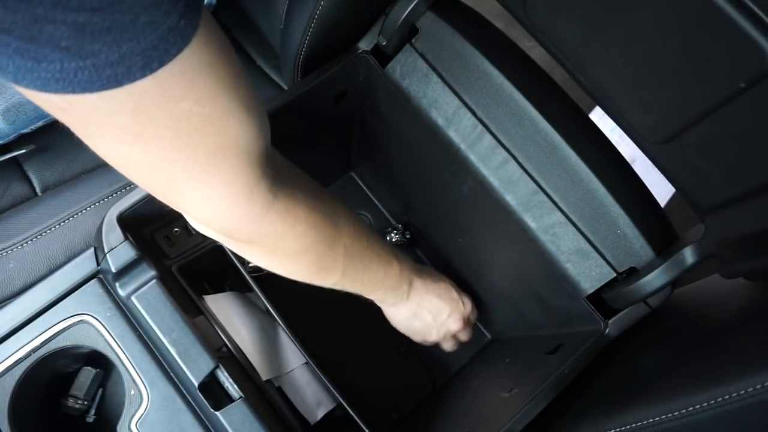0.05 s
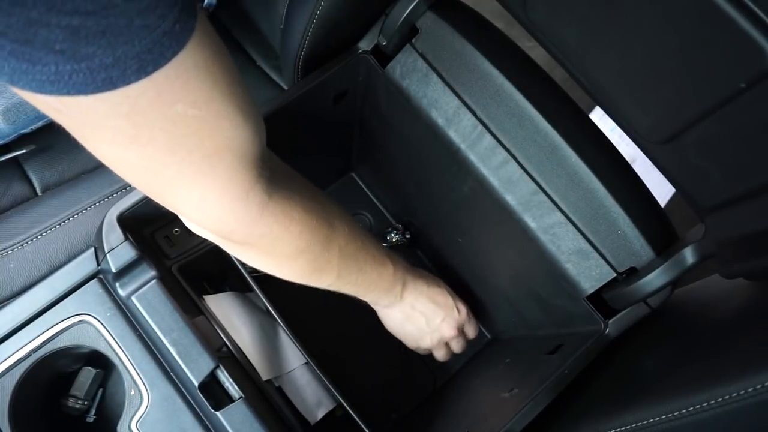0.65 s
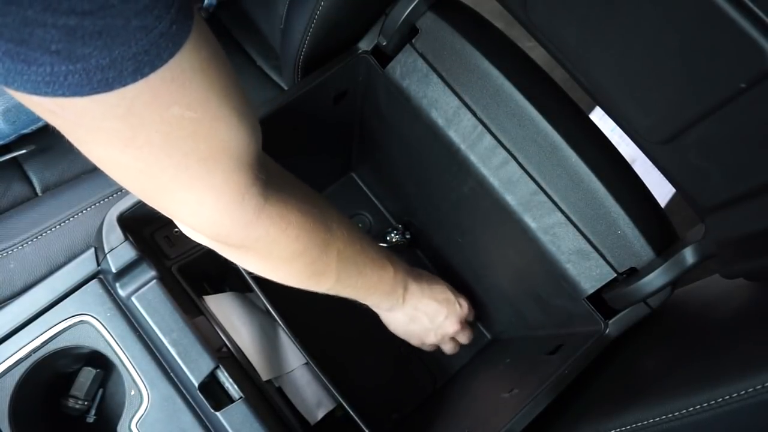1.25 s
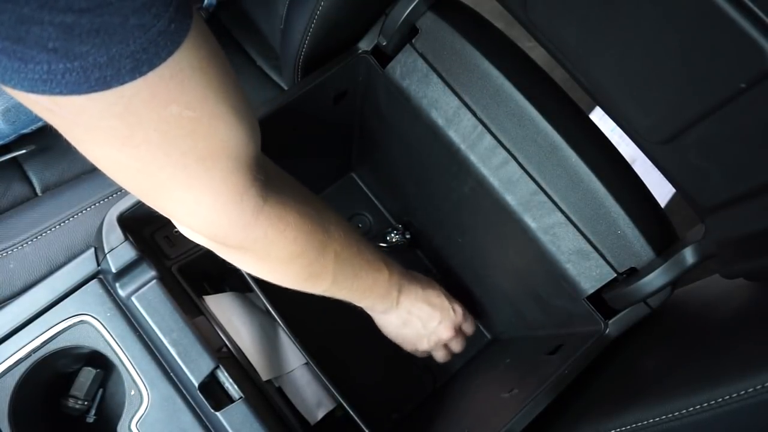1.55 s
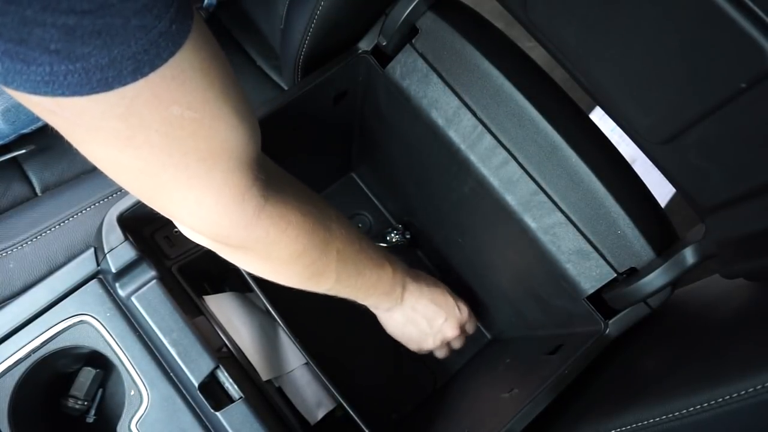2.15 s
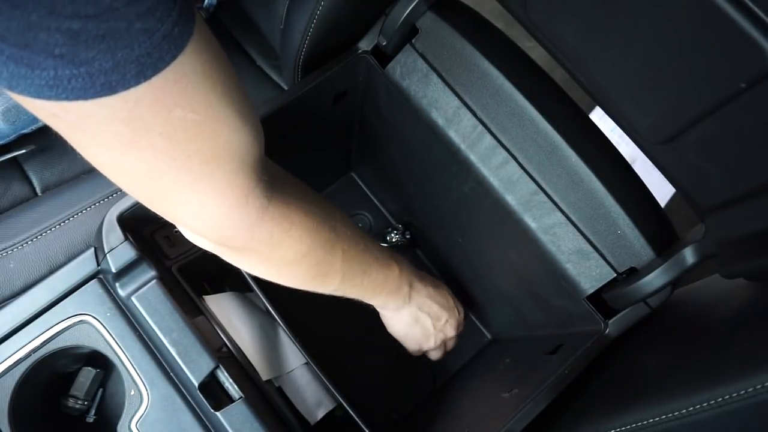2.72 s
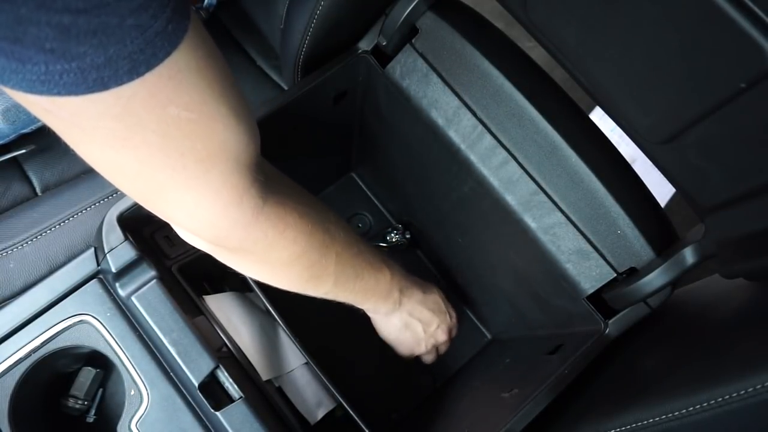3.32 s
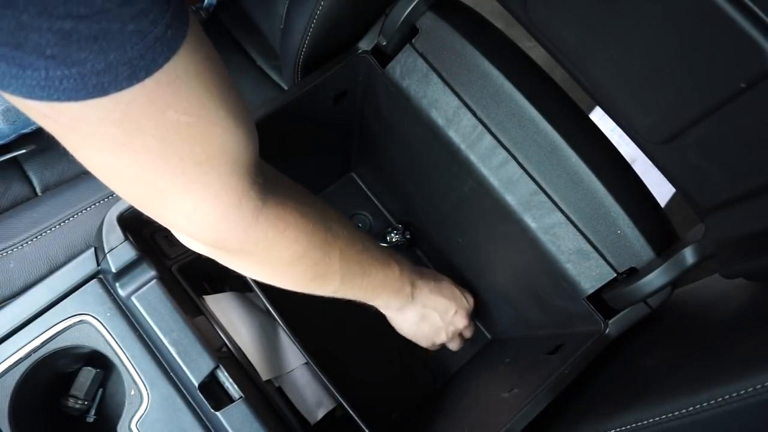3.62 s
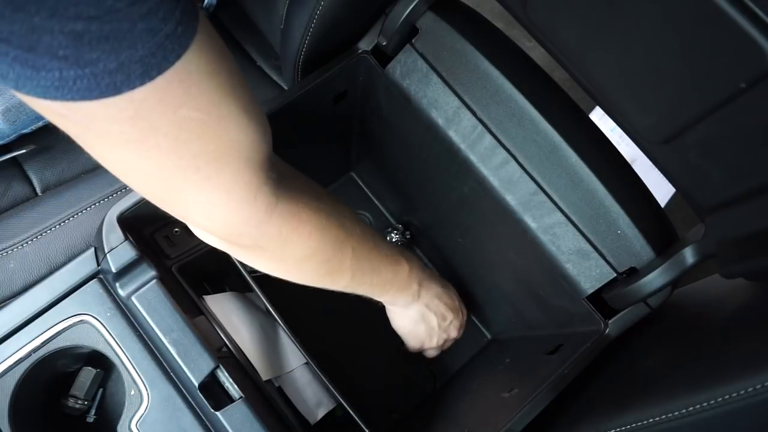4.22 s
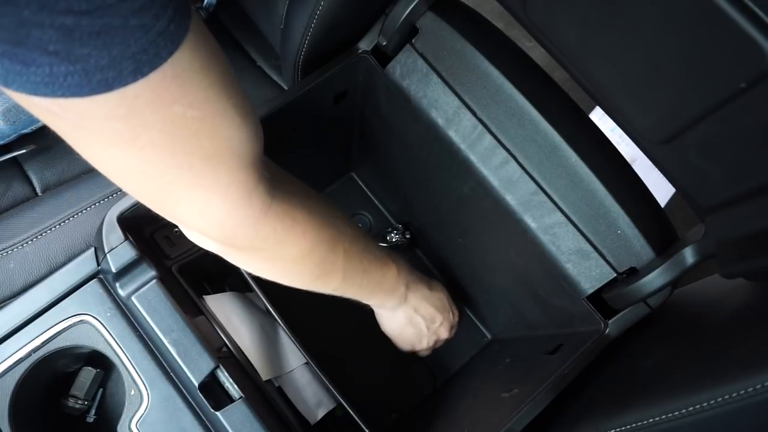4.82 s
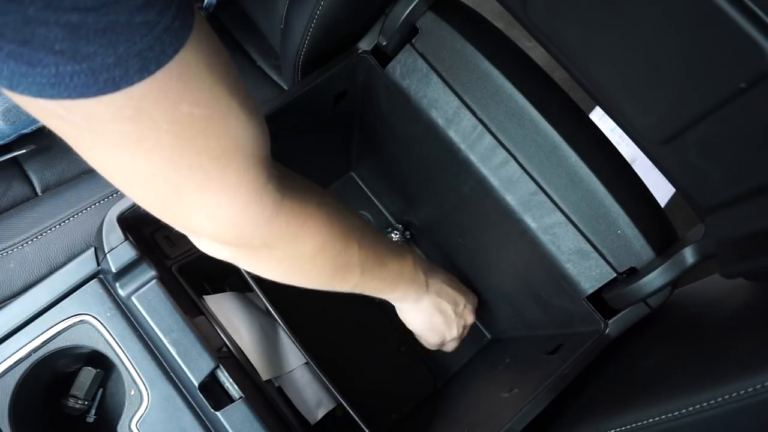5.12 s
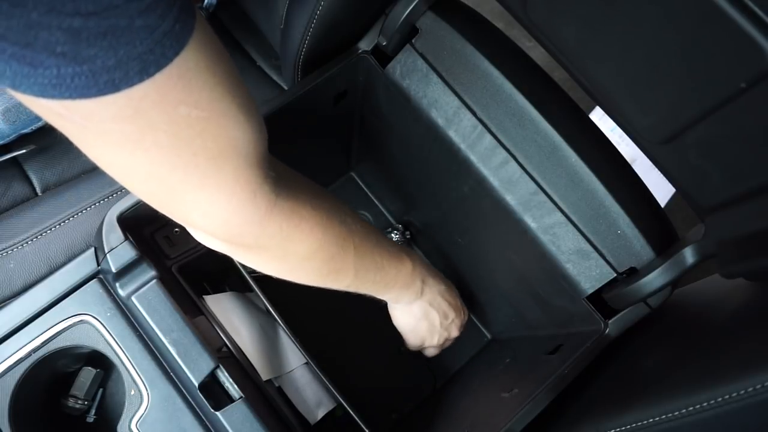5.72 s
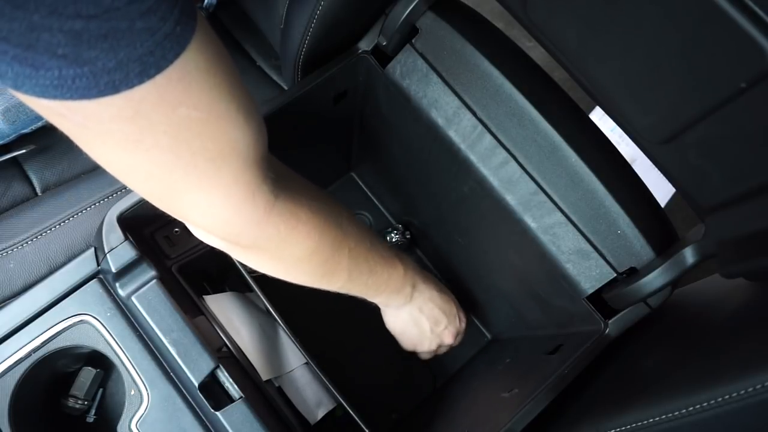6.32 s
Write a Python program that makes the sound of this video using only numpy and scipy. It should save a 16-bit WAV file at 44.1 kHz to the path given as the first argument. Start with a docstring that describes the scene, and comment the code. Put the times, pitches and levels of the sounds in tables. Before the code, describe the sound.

A hand works bolts and small hardware inside an open plastic storage bin in a parked car, heard close and slightly to the right. A faint cabin rumble and thin hiss run throughout. From the start come quick, uneven clicks and knocks, each with a tiny rattle and a short, hollow plastic ring; a few are brighter metal ticks. Brief, soft scrapes on the plastic fall between them. The handling stays busy for three seconds, with a stronger knock at about 2.5 seconds. From 3 to 4.3 seconds it thins to light rubbing and a few faint ticks. A firm click at 4.4 seconds starts another cluster, and the loudest knock lands at 5.2 seconds, after which the volume dips briefly. More distinct knocks follow at about 5.6, 5.9 and 6.4 seconds, with a little scraping up to the end at 6.6 seconds.

```python
"""A hand works bolts and small hardware at the bottom of an open plastic storage bin in a parked car.
A faint cabin rumble and hiss are there from the start. At once the knocks begin: each chatters for a
few ms and rings the bin's walls and air space. Between knocks, the parts rub on the plastic.
After 3 s the knocks thin out; they pick up again at 4.4 s, and the loudest lands at 5.2 s.
A close stereo microphone hears it all, and its gain ducks after the loudest knocks."""
import sys
import numpy as np
from scipy import signal
from scipy.fft import rfft, irfft, next_fast_len
from scipy.io import wavfile
from scipy.ndimage import uniform_filter1d, minimum_filter1d

SR = 44100
rng = np.random.default_rng(int(sys.argv[2]) if len(sys.argv) > 2 else 0)


def unload_wav(signal):
    """Save mono or channel-first audio to the path in sys.argv[1] as 16-bit WAV at rate SR, clipped to [-1, 1]."""
    wavfile.write(
        sys.argv[1],
        SR,
        np.round(np.clip(np.atleast_2d(signal).T, -1, 1) * 32767).astype(np.int16),
    )


N = 289207
RING = 12288  # samples set aside for one touch to ring out
LEAD_S = .012  # a part slides this long before it lands


def undb(db):
    """Turn decibels into a factor to multiply by."""
    return 10 ** (np.asarray(db) / 20)


def unit(x):
    """Scale a sound so that its average level (rms) is 1."""
    return x / np.sqrt(np.mean(x ** 2))


def tint(x, points):
    """A tone control that follows (f/Hz, level/dB) points and never rings ahead of the sound."""
    n = next_fast_len(x.shape[-1] // 2 + 1024) * 2
    hz, db = np.transpose(points)
    gain = undb(np.interp(np.log(np.arange(n // 2 + 1) * SR / n + 1), np.log(hz), db))
    cepstrum = irfft(np.log(gain))
    cepstrum[1:n // 2] *= 2  # move all ringing to after its cause
    cepstrum[n // 2 + 1:] = 0
    return irfft(rfft(x, n) * np.exp(rfft(cepstrum)))[..., :x.shape[-1]]


def stereo_noise(size, apart_hz):
    """White noise, alike left and right in the bass and unrelated well above apart_hz."""
    mid, side = rfft(rng.standard_normal((2, size)))
    hz = np.arange(len(mid)) * SR / size
    share = hz ** 2 / (hz ** 2 + apart_hz ** 2) / 2
    return irfft(mid * np.sqrt(1 - share) + side * np.sqrt(share) * np.array([[1], [-1]]), size)


def steady_noise(tone, apart_hz):
    """Stereo noise with the given tone, as long as the scene, at level 1."""
    noise = stereo_noise(2 * next_fast_len(N // 2 + 1), apart_hz)
    return unit(tint(noise[:, :N], tone))


def wander(turns_per_s):
    """A smooth random curve that strays about 1 either side of zero."""
    step = int(SR / turns_per_s)
    stairs = np.repeat(rng.standard_normal(N // step + 1), step)
    return unit(uniform_filter1d(stairs, step)[:N])


# The tone of the rumble: f/Hz, relative level/dB
RUMBLE_TONE = [(20, -25), (41, -3.5), (55, -16), (80, -17), (125, -6.5), (170, -14.5), (235, -9.5),
               (350, -18), (900, -16), (1500, -24.5), (3000, -38.5)]
# The notes at which the cabin's air drones: f/Hz, level before the swells/dB
DRONE_NOTES = [(39, -77.5), (134.6, -59), (231.5, -65)]
def cabin_rumble():
    """A low rumble, plus a few wavering notes at which the air in the car resonates."""
    t = np.arange(N) / SR
    rumble = steady_noise(RUMBLE_TONE, apart_hz=1100) * undb(-46.5 + wander(2.52))
    for hz, db in DRONE_NOTES:
        angle = 2 * np.pi * hz * t
        rumble += undb(db) * (wander(11) * np.sin(angle) + wander(5.2) * np.cos(angle))
    return rumble


# The tone of the hiss: f/Hz, relative level/dB
HISS_TONE = [(300, 6.5), (1200, -26), (2000, 6.5), (3100, 7.5), (3800, 1.5), (6000, -1), (10000, -4),
             (15500, -21.5)]
# How the hiss swells and fades: t/s, level/dB
HISS_SWELLS = [(0, -58), (.95, -61), (1.1, -57), (1.7, -57.5), (1.95, -59), (3.2, -60), (4.2, -61.5),
               (4.6, -58), (5.2, -56.5), (5.4, -57), (6.56, -63)]
def cabin_background():
    """A thin hiss and the rumble swell and fade together."""
    hiss_db = np.interp(np.arange(N) / SR, *np.transpose(HISS_SWELLS))
    rumble = cabin_rumble() * undb(hiss_db - hiss_db.mean())
    hiss = steady_noise(HISS_TONE, apart_hz=2330) * undb(hiss_db)
    return rumble + hiss


def contact(chatter_s, tap=0.77, bounce=0.78, bounces=12, soft_s=0.0042, slide_db=-18, slide_s=0.0022):
    """A brief slide, a tap and a few uneven bounces; a part that chatters for long lands softly."""
    force = np.zeros(RING)
    lead = int(LEAD_S * SR)
    force[lead] = tap / (1 + (chatter_s / soft_s) ** 2)
    when = (np.arange(bounces) + rng.random(bounces)) / bounces  # 0 to 1 through the bouncing
    kicks = bounce * rng.standard_normal(bounces) * (1 - when)
    np.add.at(force, lead + (2 * chatter_s * SR * when).astype(int), kicks)
    strength = np.linalg.norm(force)
    slide = rng.standard_normal(lead) * np.exp((np.arange(lead) - lead) / (slide_s * SR))
    force[:lead] = slide * undb(slide_db) * strength / np.linalg.norm(slide)
    # notes below 550 Hz feel the whole landing as one push
    push = strength * signal.unit_impulse(RING, lead + int(chatter_s * SR / 2))
    low, high = (signal.butter(2, 550, kind, fs=SR, output="sos") for kind in ("low", "high"))
    return signal.sosfilt(low, push) + signal.sosfilt(high, force)


# The tone of the many wall vibrations and echoes in the bin: f/Hz, relative level/dB
WALL_TONE = [(100, -45), (400, -16), (800, -15.5), (1300, -10), (1900, -22), (2800, -18), (3700, -26),
             (5500, -24), (8000, -26.5), (11000, -30), (15500, -43.5)]
def wall_echoes(burst_s=0.0089, tail_s=0.085, tail_db=-11, rise_s=0.00049):
    """Crowded echoes: a quick burst from the bin, then a short tail from the muffled cabin."""
    t = np.arange(RING) / SR
    fade = undb(-60 * t / burst_s) + undb(tail_db - 60 * t / tail_s)
    shape = fade * (1 - np.exp(-t / rise_s))
    return tint(stereo_noise(RING, apart_hz=2040) * shape / np.linalg.norm(shape), WALL_TONE)


# The notes the bin rings with: f/Hz, relative level/dB, time to fade 60 dB before ring_scale/s
BIN_NOTES = [(145.5, -7.5, 0.26), (197.4, -11, 0.14), (241.5, -8.5, 0.058), (277.6, 4.5, 0.19),
             (309, 1, 0.2), (501, -3, 0.07), (550, -7, 0.11), (616, -15, 0.048), (726.3, 2, 0.071),
             (805, 0.5, 0.042), (887.7, 1.5, 0.059), (999.4, -3.5, 0.096), (1143, -20, 0.1),
             (1292, -11, 0.067), (1361, -15.5, 0.021), (1510.6, -7.5, 0.13), (1846, -17, 0.14),
             (2191, -8.5, 0.077), (2620, -19.5, 0.13), (2660, -19, 0.051), (3044, -19.5, 0.042),
             (4187, -20.5, 0.053), (4950, -26, 0.046), (5540, -31, 0.036), (5865, -24.5, 0.033)]
def bin_ring(phases, scatter_db=2.5, build_cycles=0.46, ring_scale=0.89):
    """The bin's answer to one tap; where the tap lands changes how strong each note is."""
    t = np.arange(RING) / SR
    hz, db, fade_s = np.transpose(BIN_NOTES)
    decays = np.log(1000) / (fade_s * ring_scale)
    sizes = 2 * decays / SR * undb(db + scatter_db * rng.standard_normal(len(hz)))
    ring = np.zeros((2, RING))
    for note_hz, decay, size, phase in zip(hz, decays, sizes, phases):
        age = t[:int(np.log(1000) / decay * SR)]
        build = 1 - np.exp(-age * note_hz / build_cycles)  # a note takes a moment to fill the bin
        wave = np.sin(2 * np.pi * note_hz * age + phase[:, None])
        ring[:, :len(age)] += size * build * np.exp(-decay * age) * wave
    return ring


def part_ring(low_hz=1000, high_hz=9000, fade_s=0.039, peak_db=-10, fall_db_per_octave=2.5, notes=6):
    """The touched part, muted by the fingers, adds a few short notes that change with every grip."""
    t = np.arange(RING // 4) / SR
    octaves = np.log2(high_hz / low_hz) * rng.random((notes, 1, 1))
    phases = rng.uniform(0, 2 * np.pi, (notes, 1, 1))
    apart = np.minimum(octaves, 2) * rng.normal(0, 0.39, (notes, 2, 1))  # left and right out of step
    decay = np.log(1000) / fade_s
    sizes = 2 * decay / SR * undb(peak_db - fall_db_per_octave * octaves)
    waves = np.sin(2 * np.pi * low_hz * 2 ** octaves * t + phases + apart)
    ring = np.sum(sizes * waves, axis=0) * np.exp(-decay * t)
    return np.pad(ring, ((0, 0), (0, RING - len(t))))


def struck_bin(walls, phases, own_share=0.78):
    """Bin and part ring together; each spot in the bin has partly its own echoes."""
    echoes = np.sqrt(1 - own_share) * walls + np.sqrt(own_share) * wall_echoes()
    return echoes + bin_ring(phases) + part_ring()


# The pitch ranges of a touch's thump, knock, clack, tick and sizzle: lowest f/Hz, highest f/Hz
TOUCH_BANDS = [(110, 400), (400, 1200), (1200, 4000), (4000, 8500), (8500, 16000)]
def touch_levels(level_db, slope_db, thump_db, treble_db):
    """A level for each range: a softer touch has less treble, and weight behind it adds thump."""
    centres = np.sqrt(np.prod(TOUCH_BANDS, axis=1))
    octaves = np.maximum(np.log2(centres / centres[1]), 0)
    return level_db + slope_db * octaves + np.array([thump_db, 0, *treble_db])


def colour(x, levels_db, seconds, part_hz=1000, part_db=0, part_octaves=0.17, bass_hz=135):
    """Bring each range to its level, as if the sound lasted `seconds`; the part can lift one note."""
    hz = np.arange(x.shape[1] // 2 + 1) * SR / x.shape[1] + 1
    power = np.mean(np.abs(rfft(x)) ** 2, axis=0) * 2 / (x.shape[1] * seconds * SR)
    log_centres = np.log(np.prod(TOUCH_BANDS, axis=1)) / 2
    db = part_db / (1 + (np.log2(hz / part_hz) / part_octaves) ** 2)
    db -= 10 * np.log10(1 + (bass_hz / (hz + 10)) ** 4)  # small panels give off little bass
    for _ in range(3):  # each pass gets closer to the wanted levels
        shaped = power * undb(2 * db)
        now_db = 10 * np.log10([shaped[(hz >= lo) & (hz < hi)].sum() for lo, hi in TOUCH_BANDS])
        db += np.interp(np.log(hz), log_centres, levels_db - now_db)
    return tint(x, np.column_stack([hz, db]))


# Parts landing in the bin: t/s, relative level/dB, treble slope/dB per octave (near 0 = hard metal
# tip), extra thump/dB, half the chatter time/s, the part's own note f/Hz
LANDINGS = [(0.0306, -28.5, -5.5, 0, .0046, 730), (0.1084, -24, -5, -2, 0.0072, 2350),
            (0.2585, -27.5, -0.9, -3.5, 0.0033, 1680), (0.2832, -29, -10, -7, 0.0027, 716),
            (0.3096, -32, -4.5, -3, 0.0068, 790), (0.4881, -33.5, -10.5, 1, 0.0042, 2780),
            (.5, -24.5, -9.5, -8.5, 0.0064, 2680), (0.502, -57, 3, -8, 0.0016, 9200),
            (0.5578, -21.5, -6.1, -11.5, 0.0099, 720), (0.5881, -18.5, -8, -10.5, 0.0021, 1020),
            (0.5973, -20.5, -6, -21, .001, 1010), (0.6573, -30, -7.9, -10, 0.0044, 1320),
            (0.7509, -23.5, -6, -17, 0.0068, 720), (0.8367, -35.5, -6, 0.5, 0.0025, 930),
            (.982, -31.5, -7, -7.5, 0.0072, 720), (1.0607, -23, -9.5, -6, 0.0053, 930),
            (1.0718, -23, -6.5, -5, 0.0078, 1000), (1.074, -49.5, 4.5, -6, .003, 9100),
            (1.0964, -42.5, 0, 1, .0026, 796), (1.118, -19, -7.5, -7.5, 0.0068, 760),
            (1.2173, -16.5, -6.5, -7.5, 0.0085, 2500), (1.436, -31, -10, -3.5, 0.0053, 750),
            (1.4535, -25, -7, -7.5, 0.0033, 700), (1.508, -26.5, -10, -5.5, 0.0057, 704),
            (1.5551, -20.5, -6.5, -9, 0.00091, 940), (1.6721, -21.5, -5, -6.5, 0.0051, 920),
            (1.6814, -23.5, -6.5, -22, .0014, 1410), (1.699, -29, -16, -5, 0.0018, 830),
            (1.8042, -21, -6, -3, 0.0027, 590), (1.8106, -16, -6.5, -17, .0011, 705),
            (1.8876, -30, -5, -6.5, 0.0035, 1470), (2.0327, -26, -7, -6.5, 0.0035, 700),
            (2.0961, -31, -5, -3.5, 0.0039, 990), (2.156, -24, -7, -7, 0.0032, 1020),
            (2.2071, -31.5, -9.5, -14, 0.0042, 760), (2.295, -38.5, -10.5, -8, .009, 604),
            (2.3825, -25.5, -10.5, -14, 0.003, 970), (2.45, -10.5, -8, -6.5, 0.0026, 940),
            (2.642, -41, -8.5, -0.5, 0.0029, 900), (2.8498, -33.5, -5, -18, 0.003, 2300),
            (2.9231, -19, -9, -7.5, 0.0072, 987), (2.9252, -36, 2.5, -10, 0.0046, 4530),
            (3.0386, -31, -10, -2, 0.0042, 1000), (3.1347, -32.5, -10.5, -3, 0.0011, 930),
            (3.385, -43.5, -2, -3, 0.0056, 1230), (3.7496, -44.5, -3.5, -9, 0.0019, 1470),
            (4.069, -48, -5, -10, 0.0024, 1900), (4.3685, -14, -6, -3.5, 0.0053, 2820),
            (4.457, -29.5, -5, -17, 0.0027, 2780), (4.468, -21.5, -7, -6.5, 0.004, 2900),
            (4.615, -21.5, -13, -6.5, 0.0054, 930), (4.6611, -24.5, -12.5, -12, 0.00091, 905),
            (4.684, -30, -13.5, -1.5, 0.0066, 604), (4.7027, -32, -3.5, 2.5, 0.0045, 1710),
            (4.8574, -32, -9, -2.5, 0.01, 1237), (4.9013, -38, -11.5, -4, 0.0054, 920),
            (5.2295, -5, -8.5, -13, .0028, 985), (5.2797, -17.5, -10.5, -5, 0.0079, 800),
            (5.4755, -38.5, -10.5, 5, 0.0064, 730), (5.5576, -14.5, -14, -3, 0.0057, 803),
            (5.559, -47, 1, -8, 0.0041, 9100), (5.791, -30.5, -8, -10, 0.0027, 2930),
            (5.895, -29.5, -7.5, -12, 0.0056, 1340), (5.93, -13.5, -7, -1.5, 0.0089, 1130),
            (5.932, -47, 4.5, -4, 0.0047, 8800), (5.9878, -23.5, -8, -7.5, 0.0054, 1360),
            (6.319, -48, -5.5, 7.5, 0.0032, 610), (6.425, -11.5, -4.5, -6.5, 0.0042, 670)]
def knocks(walls, phases, metal_above_hz=1200):
    """Every landing rings the bin; the harder the touch, the brighter it sounds."""
    plastic_db = (1, 0.79, -2.2)  # extra clack, tick and sizzle
    metal_db = (3.2, 0, -5)  # a bolt spends the blow on its own note
    out = np.zeros((2, N + RING))
    for start, level_db, slope_db, thump_db, chatter_s, part_hz in LANDINGS:
        hit = irfft(rfft(struck_bin(walls, phases)) * rfft(contact(chatter_s)))
        treble_db = metal_db if part_hz > metal_above_hz else plastic_db
        levels_db = touch_levels(level_db, slope_db, thump_db, treble_db)
        i = max(int((start - LEAD_S) * SR), 0)
        out[:, i:i + RING] += colour(hit, levels_db, seconds=.02, part_hz=part_hz, part_db=10)
    return out[:, :N]


# Parts rubbing on the plastic: start t/s, end t/s, relative level/dB, treble slope/dB per octave
STROKES = [(0.072, 0.096, -26, -5.5), (0.121, 0.131, -31, -3.5), (.335, 0.429, -34, -7),
           (0.531, 0.57, -33, -9), (0.612, 0.722, -34.5, -10), (0.788, 0.879, -29.5, -8),
           (1.013, 1.076, -30, -6.5), (1.063, 1.099, -18, -10.5), (1.27, 1.344, -29, -7.5),
           (1.344, 1.375, -38.5, -9.5), (1.483, 1.554, -33, -7.5), (1.712, 1.78, -38, -6.5),
           (2.067, 2.19, -33.5, -7), (2.142, 2.215, -30.5, -8), (2.413, 2.454, -32.5, -8.5),
           (2.787, 2.84, -35.5, -7.1), (2.816, 2.933, -32.5, -5.5), (3.106, 3.142, -30, -6.5),
           (3.151, 3.273, -37, -8), (3.492, 3.522, -35, -9.5), (3.582, 3.64, -36, -6.5),
           (3.63, 3.666, -30, -7.5), (3.708, 3.733, -41, -11), (4.32, 4.338, -28, -9),
           (4.404, 4.437, -32.5, -5.5), (4.475, 4.557, -41.5, -4.5), (4.64, 4.723, -42.5, -5.5),
           (5.117, 5.215, -26.5, -9), (5.823, 5.894, -39, -6.5), (5.89, 6.034, -32.5, -7),
           (6.375, 6.412, -43, -6.5), (6.484, 6.573, -35, -7)]
def rubbing(walls, phases, slips_per_s=750, spread_db=4.5, gain_db=-2, press_s=0.0027, release_s=0.025):
    """A dragged part sticks and slips in tiny, uneven jerks that ring the same bin."""
    out = np.zeros((2, N + RING))
    t = np.arange(RING) / SR
    average_db = np.mean(STROKES, axis=0)[2]
    for start, end, level_db, slope_db in STROKES:
        length = end - start
        pressure = np.clip(np.minimum(t / press_s, (length - t) / release_s + .5), 0, 1)
        sizes = undb(spread_db * np.minimum(rng.exponential(size=RING), 4)) * rng.choice([-1, 1], RING)
        slips = (rng.random(RING) < slips_per_s / SR) * sizes * pressure
        stroke = irfft(rfft(struck_bin(walls, phases)) * rfft(slips))
        thump_db = -4.5 - 0.34 * (level_db - average_db)  # louder strokes have a smaller share of thump
        levels_db = touch_levels(level_db, slope_db, thump_db, treble_db=(1.7, -0.81, -1.4))
        i = int(start * SR)
        out[:, i:i + RING] += colour(stroke, levels_db, seconds=length)
    return undb(gain_db) * out[:, :N]


def gain_control(x, limit_db=-12, ratio=4.86, window_s=.018, hold_s=0.23, recover_db_per_s=14):
    """A loud knock turns the volume down at once; it stays down for a moment, then creeps back."""
    power = uniform_filter1d(np.mean(x ** 2, axis=0), int(window_s * SR))
    over_db = 10 * np.log10(np.maximum(power, 1e-12)) - limit_db
    cut_db = -np.maximum(over_db, 0) * (1 - 1 / ratio)
    half = int(hold_s * SR / 2)
    held_db = minimum_filter1d(cut_db, 2 * half + 1, origin=half, mode="nearest")
    rise_db = recover_db_per_s * np.arange(N) / SR
    return x * undb(np.minimum.accumulate(held_db - rise_db) + rise_db)


def scene(apart_hz=2200, apart_rad=0.56):
    """Over the cabin's background, knocks and rubbing share one bin a little to the right."""
    hz = np.array(BIN_NOTES)[:, :1]
    # high notes reach the microphone's two sides out of step
    sides = rng.choice([-1, 1], hz.shape) * np.array([-1, 1])
    phases = rng.uniform(0, 2 * np.pi, hz.shape) + sides * apart_rad * np.minimum(hz / apart_hz, 1)
    walls = wall_echoes()
    left, right = knocks(walls, phases) + rubbing(walls, phases)
    left = tint(left, [(250, 0.8), (800, -0.43), (1400, 1.7), (2600, 0.5), (6000, -0.8), (13000, 3.0)])
    right = tint(right, [(250, 0.13), (800, 1.73), (1400, 3.35), (2600, 5.2), (6000, 2.6), (13000, 0.6)])
    return np.array([left, right]) + cabin_background()


def record(dry, top_hz=16000):
    """The recorder ducks after loud knocks, flattens peaks at full scale and cuts the highest treble."""
    limited = np.clip(gain_control(dry), -1, 1)
    return signal.sosfilt(signal.ellip(8, .2, 70, top_hz, fs=SR, output="sos"), limited)


dry = scene()
out = record(dry)
unload_wav(out)
```